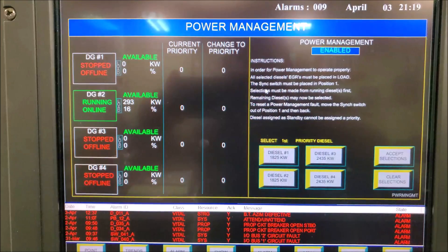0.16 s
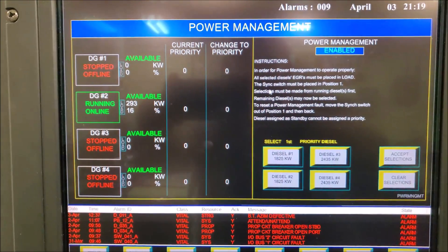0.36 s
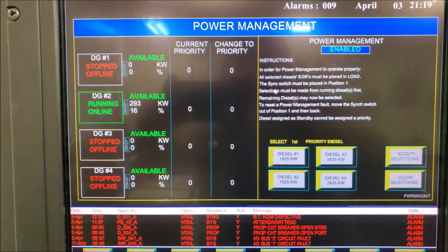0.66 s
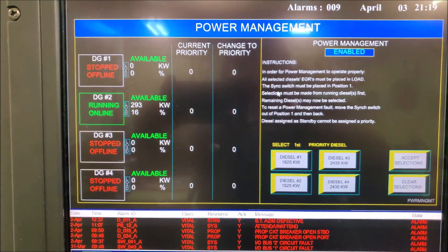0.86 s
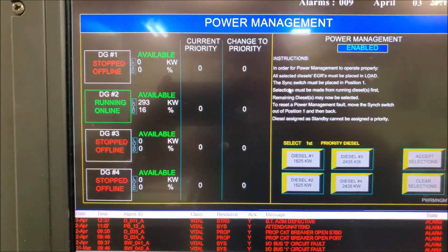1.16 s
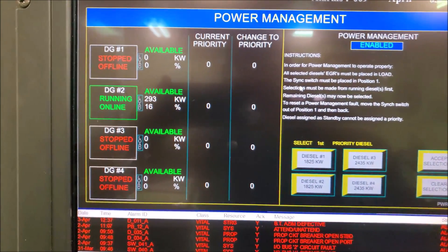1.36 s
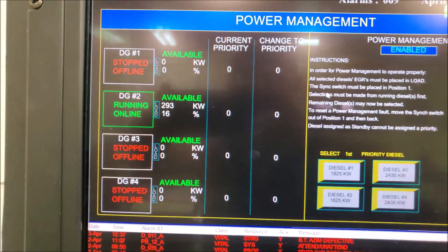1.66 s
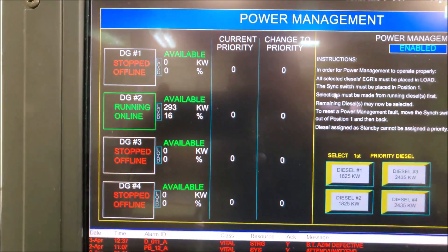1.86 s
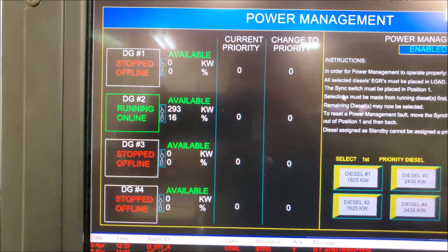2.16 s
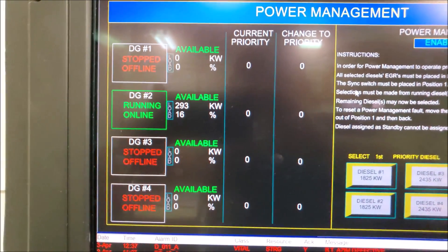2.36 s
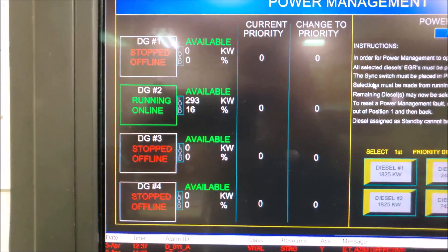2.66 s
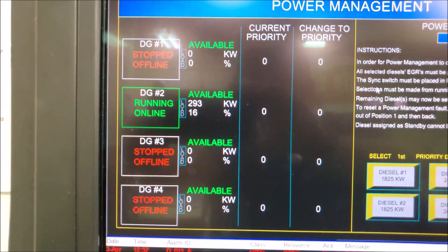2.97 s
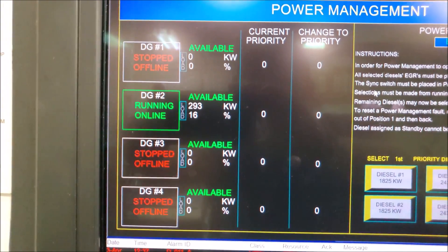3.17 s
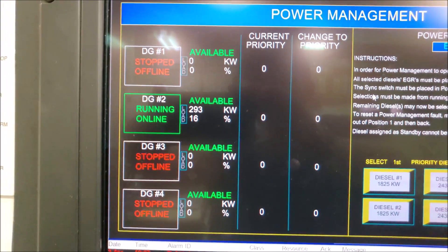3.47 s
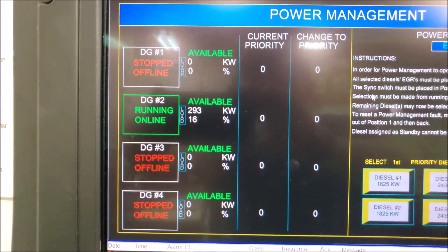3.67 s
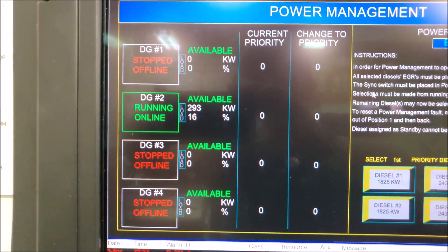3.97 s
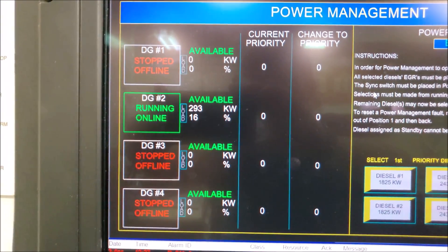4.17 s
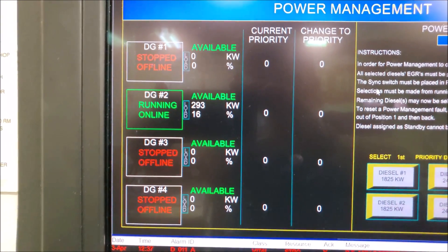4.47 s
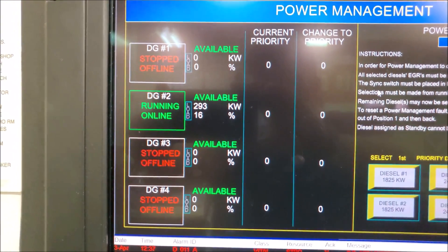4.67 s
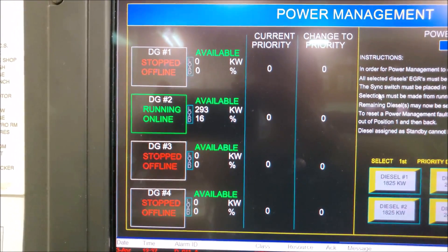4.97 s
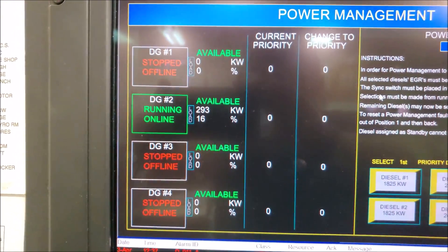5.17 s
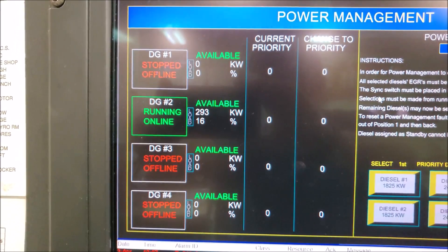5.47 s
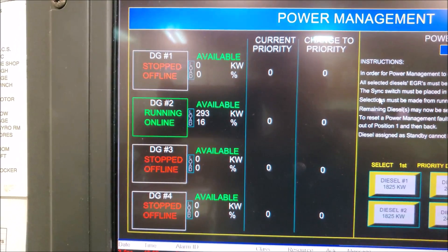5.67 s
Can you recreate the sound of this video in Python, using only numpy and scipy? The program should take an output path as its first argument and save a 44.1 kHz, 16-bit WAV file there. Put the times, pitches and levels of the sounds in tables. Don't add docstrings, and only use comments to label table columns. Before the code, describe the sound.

Steady low engine-room drone fades up after a short gap, with ventilation roar, transformer hum, piercing drive whine and one soft low bump.

```python
import sys
import numpy as np
from scipy import signal
from scipy.fft import rfft, irfft, next_fast_len
from scipy.io import wavfile
from scipy.ndimage import uniform_filter1d

SR = 44100
rng = np.random.default_rng(int(sys.argv[2]) if len(sys.argv) > 2 else 0)


def gain_from_db(level_db):
    decades = np.asarray(level_db, float) / 20
    return 10 ** decades


def digitize_waveform(pressure):
    field = np.atleast_2d(pressure).T
    bounded = np.clip(field, -1, 1)
    quanta = np.round(bounded * 32767).astype(np.int16)
    wavfile.write(sys.argv[1], SR, quanta)


N = 257103

# (frequency [Hz], density [dB per Hz])
RUMBLE_SPECTRUM = [(22, -29), (36, -19), (46, -1), (88, 0.5), (98, -5.5), (135, -0.5), (155, -4.5),
                   (172, -3), (215, -9), (235, -8), (248, -14), (262, -20.5), (330, -16.5), (365, -23)]
# (frequency [Hz], density [dB per Hz])
ROAR_SPECTRUM = [(300, -10.5), (480, -0.5), (540, -8), (720, -4), (950, -9.5), (1750, -9.5), (2500, -19),
                 (3200, -18.5), (3900, -16.5), (5300, -27), (7400, -32), (10000, -31.5), (14300, -29),
                 (15500, -52)]
# (frequency [Hz], correlation [-1..1])
PORT_LIKENESS = [(45, .995), (90, 0.9), (145, 0.95), (210, 0.99), (300, 0.57), (480, 0.8), (740, 0.18),
                 (1220, 0.03), (2010, -0.03), (15000, -0.07)]
# (frequency [Hz], left minus right [dB])
PORT_BALANCE = [(60, 1.5), (110, 2), (200, -1), (380, 0.5), (700, -1), (1290, -6), (2380, -8.5),
                (4400, -3.5), (8120, -7), (15000, -3)]
# (frequency [Hz], left [dB], right [dB], pitch wander [Hz], left lead [rad])
ROTOR_TONES = [(28.1, -46.5, -46.5, .1, 0), (54, -42, -42, .6, 0), (85, -39, -40, 1.2, .1),
               (101.5, -42, -42, .3, 0), (231.8, -44, -45, 1.2, .3), (281.2, -49, -46, .1, 1.1),
               (329.5, -59, -57, 1.5, 0), (511.1, -58, -58, .3, -.6), (667.6, -70, -64, 1.1, .5),
               (926, -74, -68, .8, 2), (1694.6, -75, -58, .3, 1.4), (1778, -78, -66, .8, 1),
               (2370, -82, -72, .8, 1), (3295, -84, -74, 2., 1), (3500, -78, -75, 1., 1)]
# (multiple of carrier, side line [motor cycles], left [dB], right [dB])
LOW_DRIVE_LINES = [(2, -4, -90, -78), (2, -3, -92, -81), (2, -2, -90, -77), (2, -1, -75, -74),
                   (2, 0, -82, -66), (2, 1, -84, -84), (2, 2, -84, -78), (3, -4, -95, -84),
                   (3, -3, -95, -82), (3, -1, -83, -74), (3, 0, -92, -78), (3, 1, -94, -83),
                   (3, 2, -87, -84), (3, 4, -94, -81), (3, 5, -97, -85)]
# (side line [hum cycles], left [dB], right [dB])
HIGH_DRIVE_LINES = [(-5, -86, -77), (-4, -75, -72), (-3, -82, -82), (-2, -80, -75), (-1, -78, -67),
                    (0, -66, -61), (1, -82, -74), (15, -79, -73)]
# (frequency [Hz], left [dB], right [dB])
FAINT_DRIVE_LINES = [(12482, -92, -75), (12575, -94, -77), (12668, -94, -78), (13880, -98, -87),
                     (13972, -98, -84)]
# (centre [Hz], width [Hz], level [dB])
WHINE_SKIRTS = [
    (5850, 1100, -67),
    (8850, 500, -77.5),
    (11900, 1800, -57),
    (13700, 440, -73.5),
]
# (time [s], depth [dB], half width [s])
QUIET_SPOTS = [
    (.75, 5, .3),
    (1.07, 11, .17),
    (2.15, 4.5, 0.37),
    (3.03, 4, 0.088),
    (3.55, 2, .25),
    (4.78, 5, 0.15),
    (5.38, 6.5, 0.22),
    (5.74, 7, 0.054),
]
# (time [s], left minus right [dB])
CARRIER_SLOPE = [
    (.15, 0),
    (1.0, 3),
    (1.5, -3),
    (2.3, -11),
    (3.3, -7),
    (4.3, -3.5),
    (5.83, -3.5),
]
# (multiple of hum, left [dB], right [dB], left lead [rad])
HUM_HARMONICS = [(1, -35, -34, 0), (2, -46, -43, .2), (5, -67, -64, 0), (6, -64, -63, .9),
                 (7, -69, -72, .5), (9, -70, -64, 2.3), (11, -75, -67, 1.5), (12, -67, -63, 1.9),
                 (13, -74, -65, -.5), (15, -74, -72, 1)]
# (multiple of crank speed, left [dB], right [dB], left lead [rad])
CRANK_ORDERS = [(3, -34, -34, 0), (4, -42, -41, -.1), (5, -47, -46, .1), (6, -41, -44, 0),
                (7, -29, -29, -.5), (7.5, -46, -46, -.2), (9, -49, -49, -.3), (10, -53, -53, 0),
                (11, -46, -46, .1), (15, -53, -53, .2)]

CRANK_HZ, MAINS_HUM_HZ = 15.0, 119.98
LOW_CARRIER_HZ, LOW_MOTOR_HZ, HIGH_CARRIER_HZ = 2958.8, 45.3, 11869.0
RUMBLE_DB, ROAR_DB, CARRIER_DB = -30.5, -43.5, -57
LOW_DRIVE_AWAY_DB, LOW_DRIVE_FACED_DB = -3.5, 1.2
HIGH_DRIVE_AWAY_DB, HIGH_DRIVE_FACED_DB = -2, 0.5
TURN_START_S, TURN_END_S = 0.74, 2.5
GAP_END_S, GAP_EDGE_S = .1412, 0.00027
SCRAP_S, SCRAP_LEFT_DB, SCRAP_RIGHT_DB, SCRAP_CUT_HZ = .0008, -32, -24.5, 10400
DULL_DB, DULL_FALL_DB_PER_S, DULL_FLOOR_DB, SCRAP_NOISE_END_S = -41, 3192, -86, .037
BUMP_S, BUMP_DB, BUMP_HZ, BUMP_T60_S, BUMP_RIGHT_DB = 1.2325, -13, 71, 0.133, -31
FADE_FROM_DB, FADE_START_S, FADE_END_S, FADE_KNEE_S = -28.5, .93, 2.476, 0.2
FADE_BEND = 0.9


def at_hz(points, hz):
    table_hz, value = np.transpose(points)
    return np.interp(np.log(hz), np.log(table_hz), value)


def in_time(points):
    s, value = np.transpose(points)
    return np.interp(np.arange(N) / SR, s, value)


def ramp(start_s, end_s):
    return np.clip((np.arange(N) / SR - start_s) / (end_s - start_s), 0, 1)


def drift(rate_hz):
    pole = np.exp(-400 * np.pi * rate_hz / SR)
    coarse = rng.standard_normal(N // 200 + 1002)
    slow = signal.lfilter([1], [1, -2 * pole, pole * pole], coarse)[1000:]
    return np.interp(np.arange(N) / 200, np.arange(len(slow)), slow / np.std(slow))


def stray(hz):
    return min(hz / 600, 2) * rng.normal()


def tone(hz, left_db, right_db, sway_db, lead_rad):
    turns = (np.cumsum(hz + np.zeros(N)) / SR + rng.random()) % 1
    phase_rad = 2 * np.pi * turns + lead_rad * np.array([[.5], [-.5]])
    wave = np.sin(phase_rad.astype(np.float32))
    sway = gain_from_db((sway_db * drift(1.5)).astype(np.float32))
    return np.sqrt(2) * gain_from_db(np.array([[left_db], [right_db]])) * (sway * wave)


def diffuse(shape, level_db):
    size = next_fast_len(N, real=True)
    hz = np.maximum(np.arange(size // 2 + 1) * SR / size, 1)
    mid, side = rfft(rng.standard_normal((2, size))) * shape(hz)
    alike = np.clip(at_hz(PORT_LIKENESS, hz), -1, 1)
    balance = gain_from_db(at_hz(PORT_BALANCE, hz) * np.array([[.5], [-.5]]))
    ports = np.sqrt(1 + alike) * mid + np.sqrt(1 - alike) * side * [[1], [-1]]
    pair = irfft(balance * ports, size)[:, :N]
    return gain_from_db(level_db) * pair / np.std(pair)


def fader():
    rise = uniform_filter1d(ramp(FADE_START_S, FADE_END_S) ** FADE_BEND, int(FADE_KNEE_S * SR))
    return gain_from_db(FADE_FROM_DB) + (1 - gain_from_db(FADE_FROM_DB)) * rise


def scrap():
    t = np.arange(int(SCRAP_NOISE_END_S * SR)) / SR
    bright, dull = rng.standard_normal((2, 2, SR // 10))[..., :len(t)]
    bright = bright * gain_from_db(-46 - 4300 * t)
    dull = signal.sosfilt(signal.butter(6, 4200, fs=SR, output="sos"), dull)
    dull = dull * (gain_from_db(DULL_DB - DULL_FALL_DB_PER_S * t) + gain_from_db(DULL_FLOOR_DB))
    step = signal.lfilter(*signal.butter(1, SCRAP_CUT_HZ, fs=SR), 1.0 * (t < SCRAP_S))
    step = gain_from_db(np.array([[SCRAP_LEFT_DB], [SCRAP_RIGHT_DB]])) * step
    return np.pad(dull + bright + step, ((0, 0), (0, N - len(t))))


def bump():
    t = np.maximum(np.arange(N) / SR - BUMP_S, 0)
    turns = BUMP_HZ * t + .77 * (1 - np.exp(-(t / .005) ** 2))
    onset = 1 - np.exp(-(t / 0.0037) ** 3)
    ring = gain_from_db(BUMP_DB - 60 * t / BUMP_T60_S) * onset * np.sin(2 * np.pi * turns)
    return ring * gain_from_db(np.array([[0], [BUMP_RIGHT_DB]]))


def ventilation():
    def shape(hz):
        return gain_from_db(at_hz(ROAR_SPECTRUM, hz)) * np.minimum(1, (hz / ROAR_SPECTRUM[0][0]) ** 3)

    return diffuse(shape, ROAR_DB) * gain_from_db(0.27 * drift(4.5) + 0.36 * drift(28))


def rotors():
    return sum(tone(hz + wander_hz * drift(1.199), left_db, right_db, 0.99, lead_rad)
               for hz, left_db, right_db, wander_hz, lead_rad in ROTOR_TONES)


def standing_wave():
    t = np.arange(N) / SR
    dips_db = sum(depth_db * np.exp(-((t - s) / width_s) ** 2) for s, depth_db, width_s in QUIET_SPOTS)
    return gain_from_db(CARRIER_DB - dips_db + in_time(CARRIER_SLOPE) * np.array([[.75], [-.25]]))


def low_drive(turned):
    clock_hz = LOW_CARRIER_HZ + 0.37 * drift(2.0)
    carrier = tone(clock_hz, 5.0, 3.5, 0.77, -1.54) * gain_from_db(1.0 * drift(15)) * standing_wave()
    lines = sum(tone(k * clock_hz + m * LOW_MOTOR_HZ, left_db, right_db, 1.6, stray(k * LOW_CARRIER_HZ))
                for k, m, left_db, right_db in LOW_DRIVE_LINES)
    return carrier + lines * gain_from_db(LOW_DRIVE_AWAY_DB + (LOW_DRIVE_FACED_DB - LOW_DRIVE_AWAY_DB) * turned)


def high_drive(turned):
    clock_hz = HIGH_CARRIER_HZ + 4.0 * drift(2.89)
    lines = sum(tone(clock_hz + m * MAINS_HUM_HZ, left_db, right_db, 1.8, -.5 + .4 * m)
                for m, left_db, right_db in HIGH_DRIVE_LINES)
    return lines * gain_from_db(HIGH_DRIVE_AWAY_DB + (HIGH_DRIVE_FACED_DB - HIGH_DRIVE_AWAY_DB) * turned)


def faint_drive():
    return sum(tone(hz + 1.0 * drift(2.5), left_db, right_db, 3.6, stray(hz))
               for hz, left_db, right_db in FAINT_DRIVE_LINES)


def whine_skirts():
    skirts = sum(diffuse(lambda hz: 1 / (1 + ((hz - centre_hz) / (width_hz / 2)) ** 2), level_db)
                 for centre_hz, width_hz, level_db in WHINE_SKIRTS)
    return signal.sosfilt(signal.butter(8, 14300, fs=SR, output="sos"), skirts)


def drives():
    turned = ramp(TURN_START_S, TURN_END_S)
    return low_drive(turned) + high_drive(turned) + faint_drive() + whine_skirts()


def switchboard():
    return sum(tone(k * MAINS_HUM_HZ, left_db, right_db, 1.24, lead_rad)
               for k, left_db, right_db, lead_rad in HUM_HARMONICS)


def hull_rumble():
    def shape(hz):
        return gain_from_db(at_hz(RUMBLE_SPECTRUM, hz)) * np.minimum(1, (RUMBLE_SPECTRUM[-1][0] / hz) ** 3)

    return diffuse(shape, RUMBLE_DB) * gain_from_db(0.9 * drift(6.5) + 1.68 * drift(9.6))


def diesel():
    crank_hz = CRANK_HZ + 0.0079 * drift(0.52)
    orders = sum(tone(k * crank_hz, left_db, right_db, 1.0, lead_rad)
                 for k, left_db, right_db, lead_rad in CRANK_ORDERS)
    return orders + hull_rumble()


def scene():
    return ventilation() + rotors() + drives() + switchboard() + diesel()


def top_cut(x):
    return signal.sosfilt(signal.butter(12, 15610, fs=SR, output="sos"), x)


def record(dry):
    heard = dry * fader() * ramp(GAP_END_S, GAP_END_S + GAP_EDGE_S)
    return top_cut(heard + bump() + scrap())


dry = scene()
out = record(dry)
digitize_waveform(out)
```